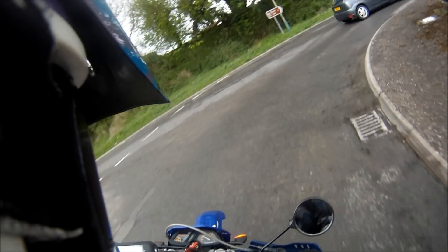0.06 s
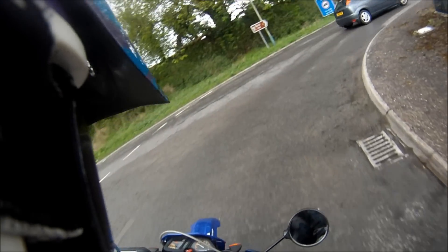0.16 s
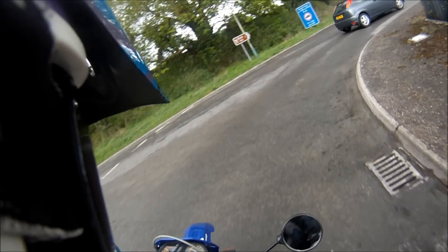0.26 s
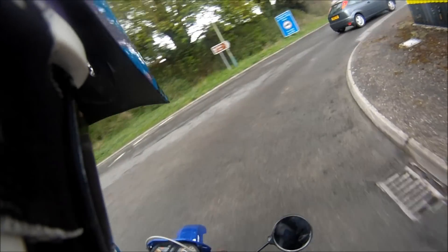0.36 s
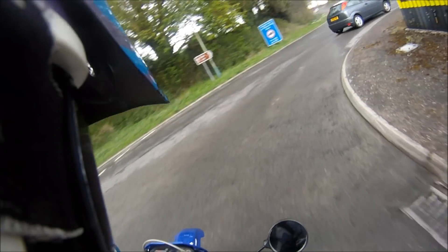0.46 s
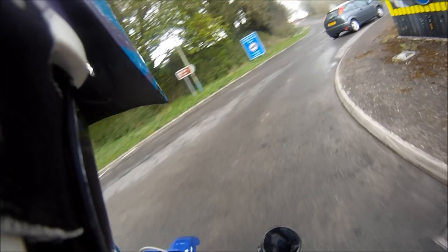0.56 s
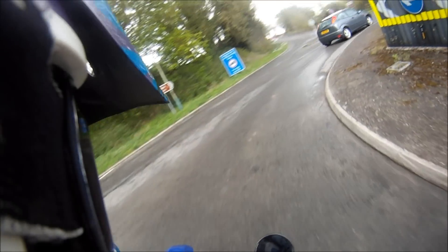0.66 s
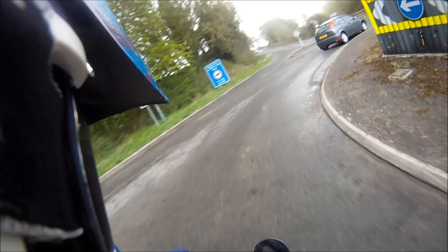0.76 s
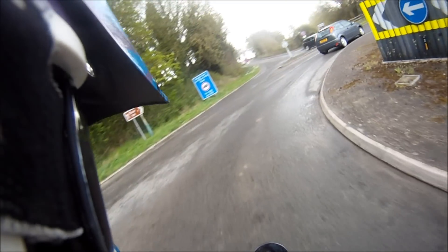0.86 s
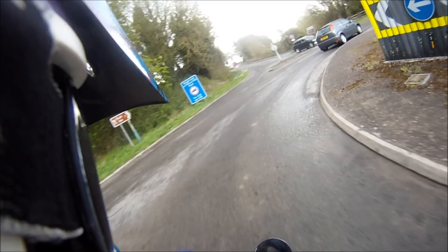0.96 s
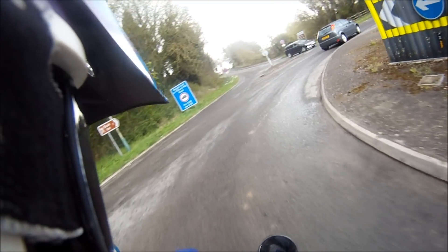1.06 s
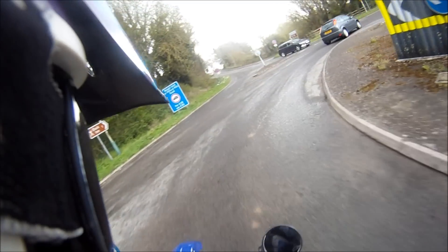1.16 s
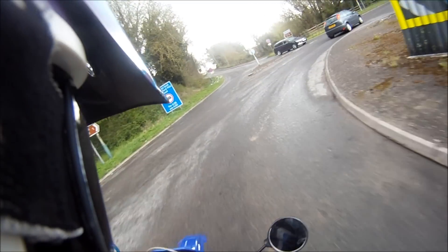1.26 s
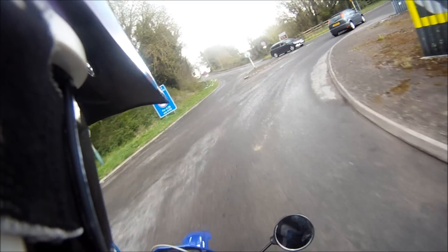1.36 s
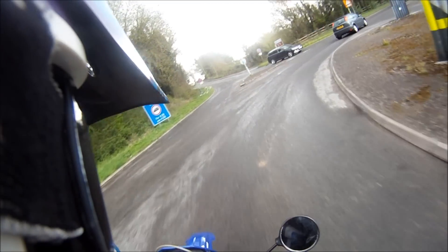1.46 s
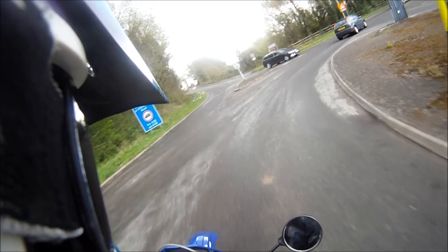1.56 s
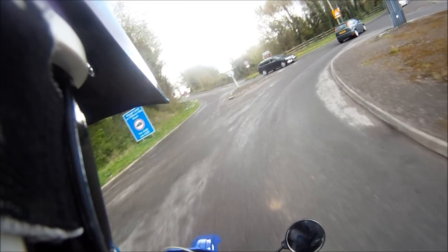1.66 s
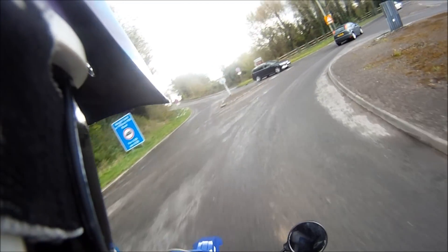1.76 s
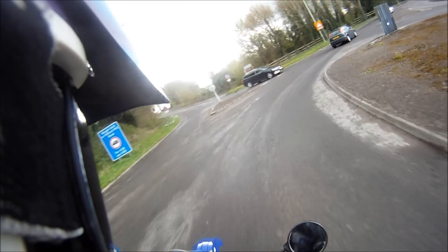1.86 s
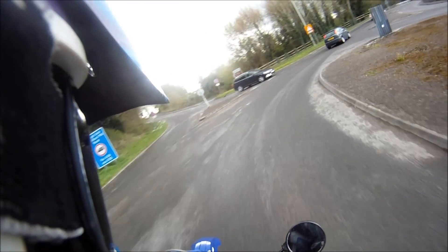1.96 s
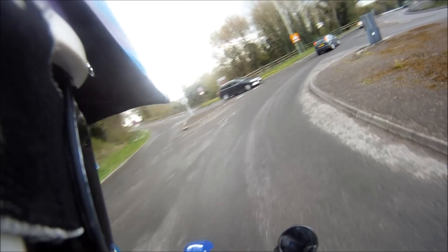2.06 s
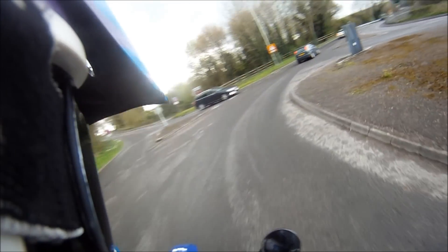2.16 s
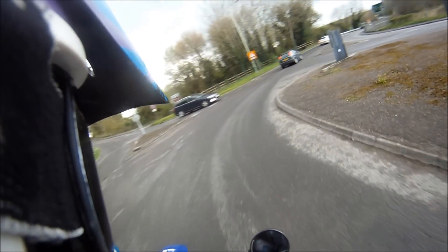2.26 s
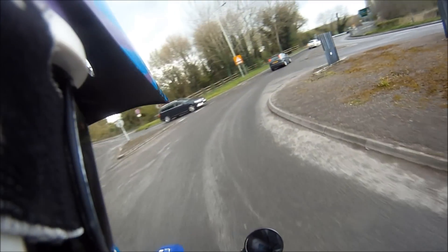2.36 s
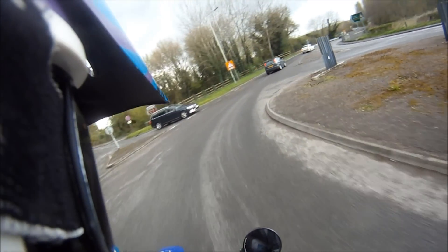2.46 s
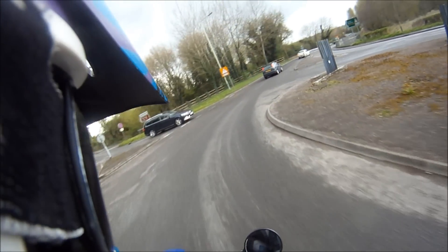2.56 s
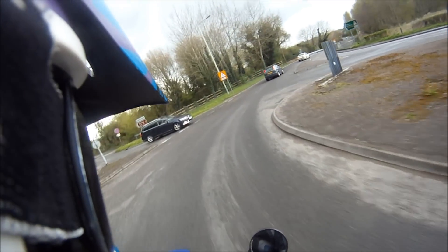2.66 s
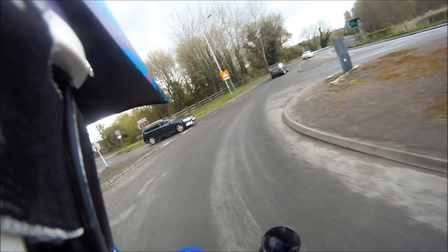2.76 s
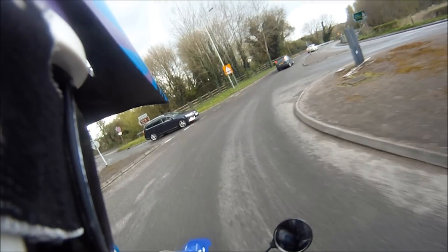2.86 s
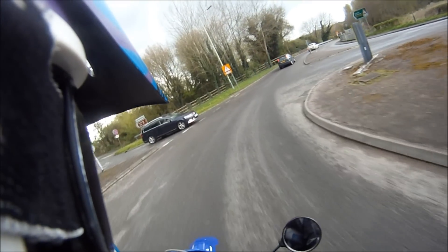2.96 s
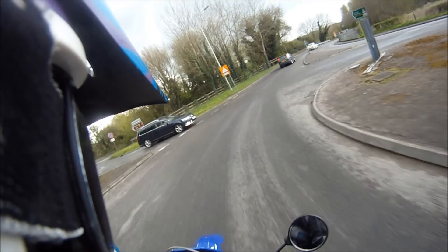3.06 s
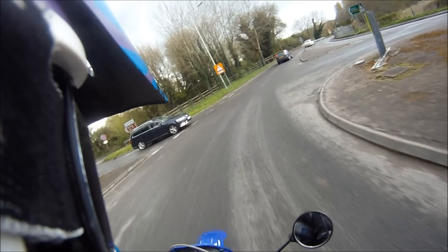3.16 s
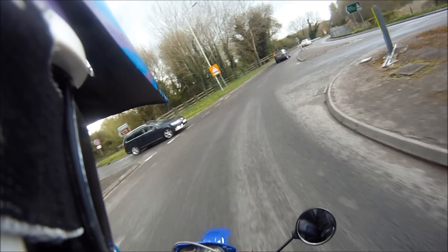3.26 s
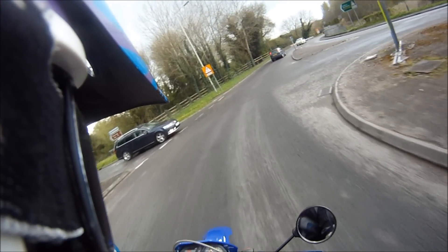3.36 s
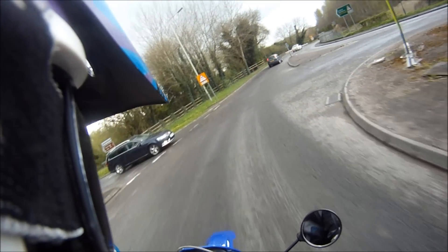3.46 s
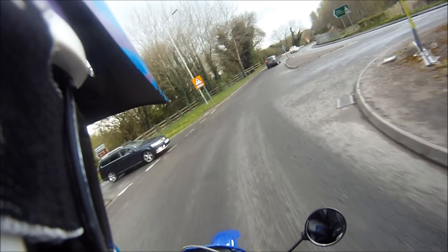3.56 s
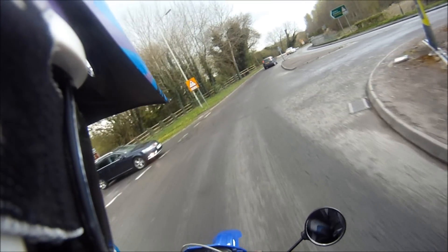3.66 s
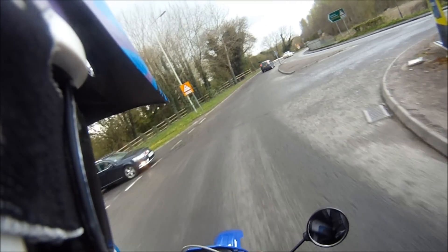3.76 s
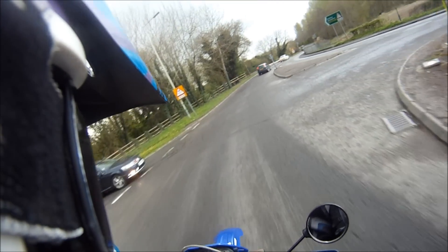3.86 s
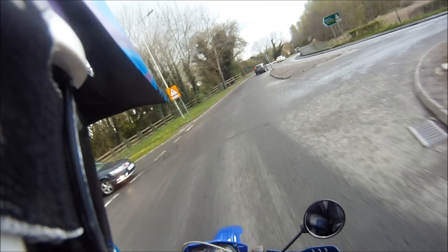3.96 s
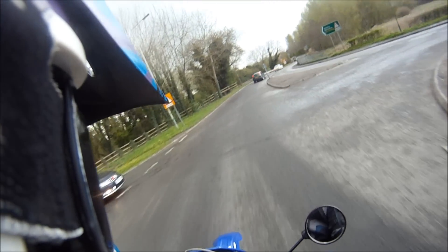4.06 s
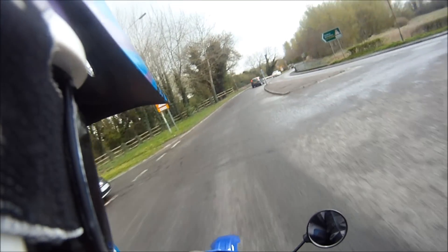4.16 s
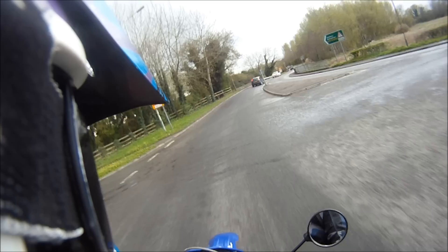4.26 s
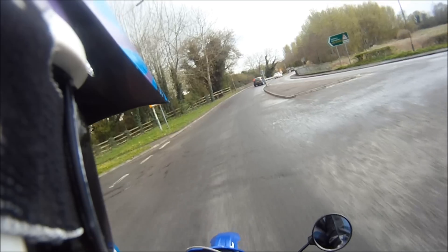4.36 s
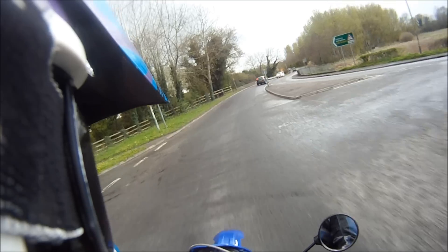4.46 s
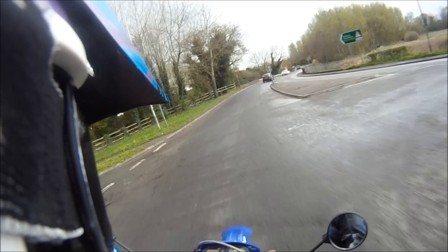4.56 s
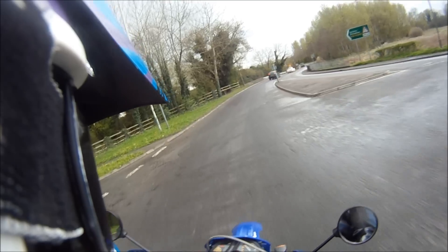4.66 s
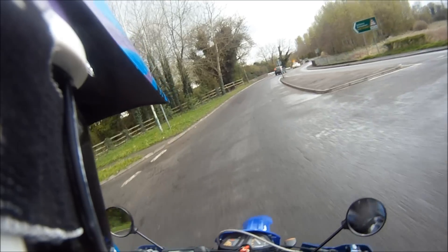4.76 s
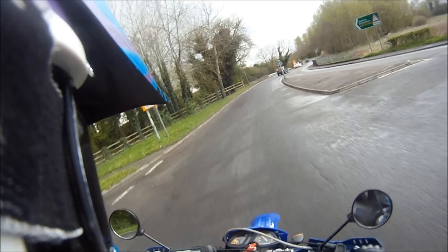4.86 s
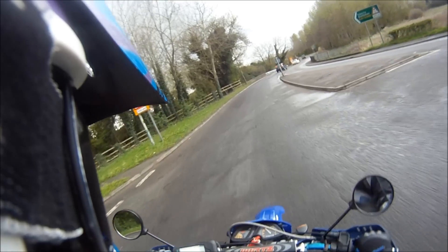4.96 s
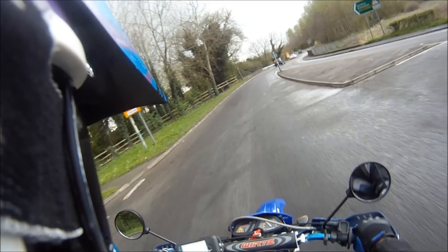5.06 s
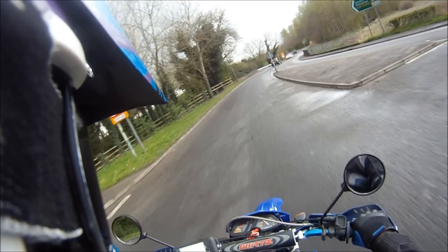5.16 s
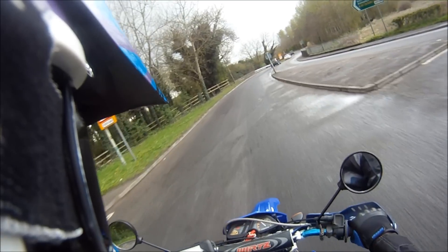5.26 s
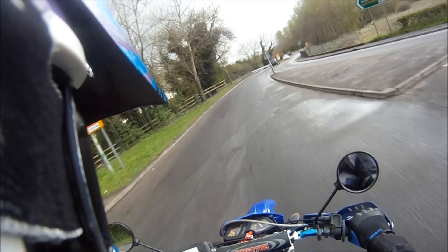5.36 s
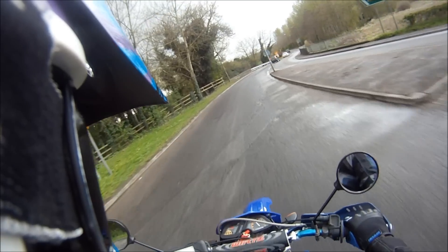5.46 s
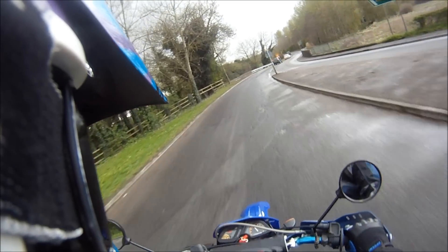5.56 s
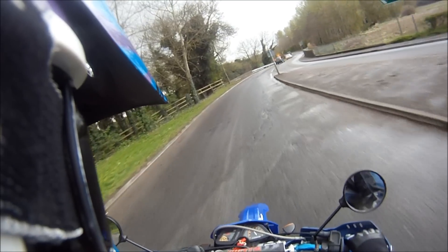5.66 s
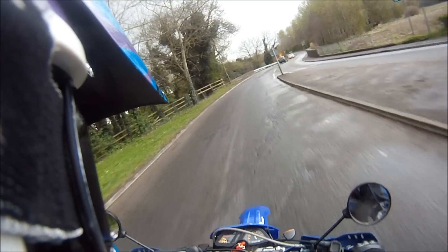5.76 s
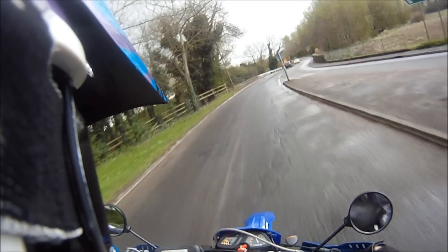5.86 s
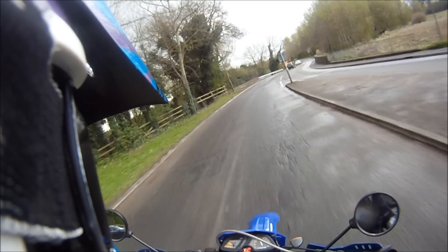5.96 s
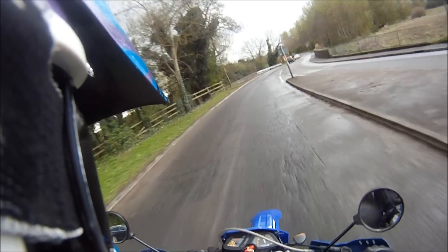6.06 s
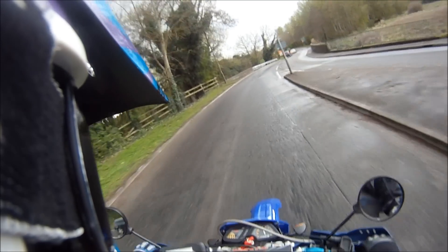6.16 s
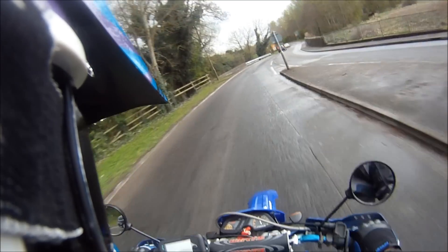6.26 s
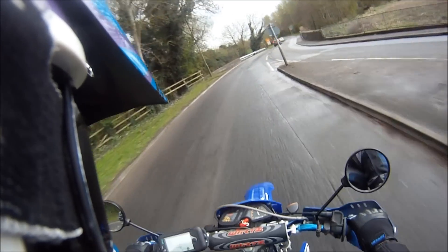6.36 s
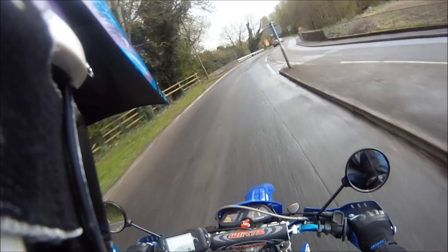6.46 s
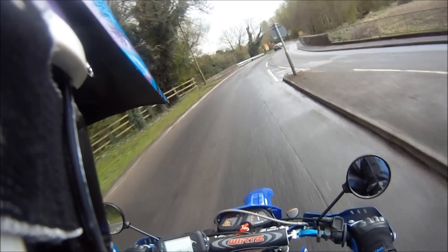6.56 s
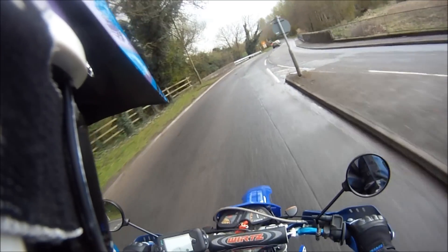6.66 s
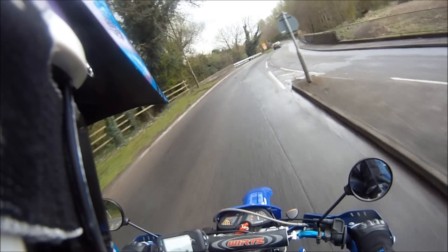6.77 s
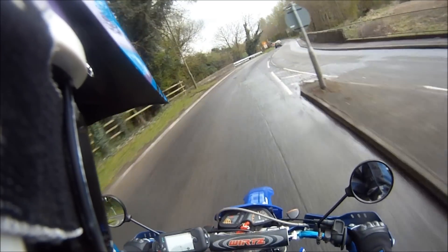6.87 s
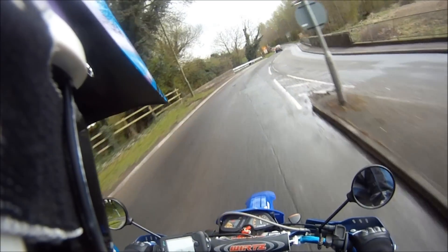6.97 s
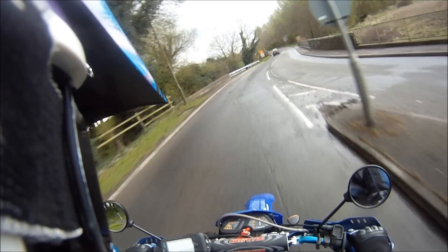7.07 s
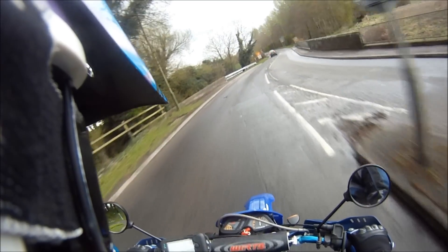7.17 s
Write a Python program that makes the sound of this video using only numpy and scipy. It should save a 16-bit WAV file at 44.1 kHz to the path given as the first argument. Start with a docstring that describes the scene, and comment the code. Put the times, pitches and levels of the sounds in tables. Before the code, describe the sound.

A small two-stroke moped drones and rattles at low, even revs, then accelerates along the road, its buzz growing higher, louder and tinnier. Near the end the throttle shuts for a moment, the pitch drops with a gear change, and the engine starts climbing again. Heard from the rider's helmet, wind thumps on the microphone over a rush of air and tyres that swells with speed.

```python
"""A two-stroke moped drones and rattles round a roundabout, revs away and changes up a gear at six seconds.
Exhaust pulses make the drone and ring the pipe; piston knocks and hissing gas rattle the cylinder.
Heard from the rider's helmet, wind buffets the microphone over a rush of air and tyres.
The small camera samples slowly and holds each sample, which mirrors the rattle into a fizzy treble."""
import sys
import numpy as np
from scipy import signal
from scipy.fft import rfft, irfft, next_fast_len
from scipy.io import wavfile
from scipy.ndimage import uniform_filter1d

SR = 44100
rng = np.random.default_rng(int(sys.argv[2]) if len(sys.argv) > 2 else 0)


def store_wav(level_fs):
    """Save 16-bit WAV to argv[1]."""
    pcm = np.round(np.clip(np.atleast_2d(level_fs), -1, 1) * 32767)
    wavfile.write(sys.argv[1], SR, pcm.T.astype(np.int16))


N = 318843
TIME = np.arange(N) / SR
FULL_POWER_HZ = 125  # firings per second at which the engine reaches full power

# The lowest three harmonics (multiples of the firing rate): level_db, loss_db_per_octave below full power
DRONE_HARMONICS = [(-44, 12.5), (-41, 34.5), (-43.5, 35.5)]
# The higher harmonics of an exhaust pulse: harmonic_number, level_db
PULSE_HARMONICS = [(4, 6), (5, 3.5), (6, 2.5), (7, 5.5), (8, 4), (9, 5), (10, 3.5), (11, -1.5), (12, -1),
                   (13, -2.5), (14, -3.5), (15, -5.5), (16, 0.5), (17, -5), (18, -2)]
# How the silencer shapes the low drone and the higher buzz: pitch_hz, gain_db
DRONE_TONE = [(80, -3.5), (100, 0.5), (110, -4), (138, 3), (168, -0.5), (200, 5.5), (250, 2), (275, -1.5),
              (302, -8), (325, -4), (350, -11), (381, 5.5), (450, -6.5), (480, 0.5)]
BUZZ_TONE = [(320, -7), (355, -13), (400, -3), (445, -1), (500, 0), (570, 0), (650, 2), (715, -10),
             (790, 4), (850, 1), (940, -11), (1010, -2), (1100, -22)]
# The ringing notes of the expansion chamber (the exhaust's bulge) and pipe: pitch_hz, width_hz, gain_db
CHAMBER_NOTES = [(1096, 34, 0)]
PIPE_NOTES = [(1185, 40, 9.5), (1250.6, 21, 5.5), (1347, 40, -1.5)]
# How loud each is as the engine speeds up: firings_per_s, level_db
BUZZ_LEVELS = [(79.5, -44.5), (82.5, -43), (92, -39), (104, -43.5), (111, -37.5), (120, -41), (140, -38.5),
               (152, -45), (165, -40.5)]
CHAMBER_LEVELS = [(80, -47), (91, -36), (101, -38), (112, -76), (130, -62), (160, -40)]
PIPE_LEVELS = [(79.5, -49.5), (82.5, -42), (93, -46), (103, -43), (108, -34.5), (120, -37), (131, -33),
               (147, -39), (155, -32), (165, -32.5)]
# Swell when a harmonic nears a pitch, drop with the throttle shut: pitch_hz, reach_hz, swell_db, drop_db
CHAMBER_RESPONSE = (1098, 25, 4.8, 1.3)
PIPE_RESPONSE = (1186, 24.5, 8.1, 8.5)

def exhaust(turns, firing_hz, shut, roughness, gas):
    """Pulses leave the silencer as a drone and a buzz; their higher harmonics ring the chamber and pipe."""
    uneven_turns = turns + .03 * roughness * drift(110)

    def harmonic(k):
        """A tone at k times the firing rate, shaken by rough burning."""
        tone = np.sqrt(2) * np.sin(2 * np.pi * (k * uneven_turns + .55 * rng.random()))
        return tone * (1 + .55 * roughness * drift(45))

    octaves_below = np.maximum(np.log2(FULL_POWER_HZ / firing_hz), 0)
    drone = sum(from_db(db - loss_db * octaves_below) * gain_at(DRONE_TONE, k * firing_hz) * harmonic(k)
                for k, (db, loss_db) in enumerate(DRONE_HARMONICS, 1))
    pulse = [(k, from_db(db + 2 * drift(3)) * harmonic(k)) for k, db in PULSE_HARMONICS]
    silenced = sum(gain_at(BUZZ_TONE, k * firing_hz) * wave for k, wave in pulse)
    buzz = from_db(at_speed(BUZZ_LEVELS, firing_hz)) * steady(silenced, .19)
    flow = sum(wave for _, wave in pulse) + from_db(46) * gas
    chamber = ringing(flow, CHAMBER_NOTES, CHAMBER_LEVELS, CHAMBER_RESPONSE, firing_hz, shut)
    pipe = ringing(flow, PIPE_NOTES, PIPE_LEVELS, PIPE_RESPONSE, firing_hz, shut)
    return drone + buzz + chamber + pipe


# How hard the piston slaps the cylinder wall: time_s, level_db
PISTON_SLAP = [(0, -1), (1.0, -2.5), (1.3, -5), (2.3, -2), (3.0, -1.5), (4.7, -7), (5.4, -6), (6.0, -1.5),
               (6.4, -19), (7.23, -4)]
# The knocks that follow each slap: share_of_turn, level_db
LATER_KNOCKS = [(0.219, -8), (0.508, -6), (0.768, -4), (0.902, -5.5)]
# The notes of the cooling fins, cylinder, thin rasping covers and tinny sizzle: pitch_hz, width_hz, gain_db
FIN_NOTES = [(1762, 91, -3.5), (1823, 25.5, 7.5), (1826, 30, -10)]
CYLINDER_NOTES = [(1875, 70, -3), (2005, 85, 1), (2050, 400, -9), (2130, 90, -8), (2305, 130, -9)]
COVER_NOTES = [(2550, 140, 0), (2710, 130, -1.5), (2860, 160, -4), (3150, 200, -9)]
SIZZLE_NOTES = [(3150, 526, 2.5), (3538, 340, 4.5), (3980, 170, -0.5), (4270, 220, -7), (4656, 230, -1),
                (5456, 190, -9.5)]
# How loud each is as the engine speeds up: firings_per_s, level_db
FIN_LEVELS = [(80, -39), (82.5, -31.5), (87, -39), (102, -42), (116, -53), (125, -33.5), (135, -33),
              (149, -31.5), (157, -33)]
CYLINDER_LEVELS = [(80, -45), (100, -37), (112, -34.5), (122, -32), (133, -30.5), (141, -25), (149, -32.5),
                   (157, -28.5), (165, -25.5)]
COVER_LEVELS = [(79.5, -42.5), (84, -42.5), (91, -36), (103, -40), (123, -31), (128, -32), (143, -27),
                (160, -30.5)]
SIZZLE_LEVELS = [(80, -43.5), (85, -44.5), (100, -41.5), (116, -41), (136, -32.5), (160, -32)]
# Swell when a harmonic nears a pitch, drop with the throttle shut: pitch_hz, reach_hz, swell_db, drop_db
FIN_RESPONSE = (1820, 20, 4.75, 6.6)
CYLINDER_RESPONSE = (2020, 64, 6.3, 8)
COVER_RESPONSE = (2715, 42, 1, 10.2)
SIZZLE_RESPONSE = (5300, 27, 1.1, 10.2)

def rattle(turns, firing_hz, shut, roughness, gas, gear_engages_s=6.205):
    """Piston slap, lesser knocks and escaping gas set the finned cylinder and its covers ringing."""
    slap_db, = over_time(PISTON_SLAP)
    shaking = gas + from_db(slap_db) * clicks(turns, 0, roughness)
    for share_of_turn, db in LATER_KNOCKS:
        shaking += from_db(db) * clicks(turns, share_of_turn, roughness)
    jolt_db = 7.5 * bump(gear_engages_s, .016)  # the next gear jolts the casing
    fins = ringing(shaking, FIN_NOTES, FIN_LEVELS, FIN_RESPONSE, firing_hz, shut)
    cylinder = ringing(shaking, CYLINDER_NOTES, CYLINDER_LEVELS, CYLINDER_RESPONSE, firing_hz, shut)
    covers = ringing(shaking, COVER_NOTES, COVER_LEVELS, COVER_RESPONSE, firing_hz, shut)
    sizzle = ringing(shaking, SIZZLE_NOTES, SIZZLE_LEVELS, SIZZLE_RESPONSE, firing_hz, shut)
    return fins + cylinder + from_db(jolt_db) * (covers + sizzle)


def clicks(turns, share_of_turn, roughness):
    """One click per engine turn; timing and force wander slowly, and rough burning scatters both."""
    wandering_turns = turns + (.002 + .014 * share_of_turn) * drift(6)
    when_s = np.interp(np.arange(int(turns[-1])) + share_of_turn, wandering_turns, TIME)
    time_scatter, force_scatter = rng.standard_normal((len(when_s), 2)).T * np.interp(when_s, TIME, roughness)
    position = np.clip((when_s + .00012 * time_scatter) * SR, 0, N - 2)
    force = from_db(7 * force_scatter + 1.5 * np.interp(when_s, TIME, drift(7)))
    sample = position.astype(int)
    spill = position - sample  # each click is shared between two samples
    return np.bincount(sample, force * (1 - spill), N) + np.bincount(sample + 1, force * spill, N)


def ringing(shaking, notes, levels, response, firing_hz, shut, waver_db=1.2):
    """A metal part rings, louder as a harmonic sweeps through its pitch, softer with the throttle shut."""
    pitch_hz, reach_hz, swell_db, drop_db = response
    miss_hz = pitch_hz - np.round(pitch_hz / firing_hz) * firing_hz  # gap to the nearest harmonic
    level_db = at_speed(levels, firing_hz) + swell_db / (1 + (miss_hz / reach_hz) ** 2) - drop_db * shut
    lowest_hz = notes[0][0]
    bass_cut = signal.butter(6, .92 * lowest_hz, "high", fs=SR, output="sos")  # small parts give no bass
    ring = signal.sosfilt(bass_cut, resonate(shaking, notes))
    return steady(ring, .035) * from_db(level_db + waver_db * drift(14))


# The bark fades as the revs rise: firings_per_s, level_db
BARK_LEVELS = [(80, -36.5), (83, -38.5), (88, -39), (93, -48), (101, -60)]

def bark(turns, firing_hz, roughness, pitch_hz=2080, width_hz=620):
    """At low revs the exhaust port gives one quickly dying burst each time it opens."""
    port = [(pitch_hz, width_hz, 0)]
    openings = clicks(turns, .3, roughness)
    bursts = resonate(resonate(openings, port), port)
    return from_db(at_speed(BARK_LEVELS, firing_hz)) * steady(bursts, .06)


# How loud the thumping air and the rush of air and tyres are: time_s, level_db
BUFFET_LEVELS = [(0, -38), (1.8, -39), (3.3, -43), (5, -39), (5.8, -42), (6.2, -37), (6.35, -31),
                 (7.23, -36)]
RUSH_LEVELS = [(0, -52), (2, -53), (3.5, -52), (4.7, -49), (5.3, -44), (5.9, -45), (6.2, -44), (6.4, -41),
               (7.23, -42)]
# Single gusts: peak_s, half_width_s, level_db
WIND_GUSTS = [(.75, .025, -45), (5.31, .022, -34), (6.35, .07, -36), (6.6, .15, -41)]
# How deep or bright each noise is: pitch_hz, gain_db
BUFFET_TONE = [(12, -16), (22, 2), (30, 1), (42, -3), (55, -19), (80, -18), (130, -31.5), (300, -31)]
RUSH_TONE = [(40, -43), (80, 14), (150, 11.5), (230, 9.5), (350, 11), (650, 4.5), (950, 4), (1500, 14.5),
             (2500, -21), (5500, -58)]
GUST_TONE = [(25, -13), (55, 10), (110, -6), (200, -23.5), (400, -38), (1000, -53)]

def wind(lumps_db=2, flutter_db=3.2):
    """Swirls of air thump on the helmet under a broad rush; both are loudest once the moped is going fast."""
    buffet_db = over_time(BUFFET_LEVELS)[0] + lumps_db * drift(10)
    buffet = from_db(buffet_db) * steady(noise(BUFFET_TONE), .056)
    rush_db = over_time(RUSH_LEVELS)[0] + flutter_db * drift(37)
    rush = from_db(rush_db) * noise(RUSH_TONE)
    gust_gain = sum(from_db(db) * bump(peak_s, half_width_s) for peak_s, half_width_s, db in WIND_GUSTS)
    return buffet + rush + gust_gain * steady(noise(GUST_TONE), .024)


def from_db(db):
    """Turn decibels into a gain."""
    return 10 ** (np.asarray(db) / 20)


def unit_power(x):
    """Scale a signal to an average power of one."""
    return x / np.sqrt(np.mean(x ** 2) + 1e-20)


def over_time(rows):
    """Each column of a timed table at every sample."""
    times_s, *columns = np.transpose(rows)
    return [np.interp(TIME, times_s, column) for column in columns]


def at_speed(levels, firing_hz):
    """Look up the level in dB for an engine speed."""
    return np.interp(firing_hz, *np.transpose(levels))


def gain_at(tone, hz):
    """Look up the gain for a pitch."""
    pitch_hz, gain_db = np.transpose(tone)
    return from_db(np.interp(np.log(hz + 1e-9), np.log(pitch_hz), gain_db))


def bump(peak_s, half_width_s):
    """A smooth rise to one and back."""
    return np.exp(-((TIME - peak_s) / half_width_s) ** 2)


def noise(tone):
    """Noise with the given tone and a power of one."""
    size = next_fast_len(N)
    spectrum = rfft(rng.standard_normal(size)) * gain_at(tone, np.fft.rfftfreq(size, 1 / SR))
    return unit_power(irfft(spectrum, size)[:N])


def drift(changes_per_s):
    """A random wander with a typical size of one."""
    points = rng.standard_normal(4000)
    return unit_power(np.interp(TIME * changes_per_s, np.arange(len(points)), points))


def steady(x, seconds):
    """Hold the power at one over spans longer than the given time."""
    size = max(int(seconds * SR), 2)
    power = uniform_filter1d(uniform_filter1d(x * x, size), size)
    return x / np.sqrt(np.abs(power) + 1e-12)


def resonate(x, notes):
    """Ring one filter per note and add them with alternating signs; narrow notes ring longer."""
    out = 0
    for k, (pitch_hz, width_hz, db) in enumerate(notes):
        decay = np.exp(-np.pi * width_hz / SR)
        gain = (1 - decay ** 2) / 2
        feedback = [1, -2 * decay * np.cos(2 * np.pi * pitch_hz / SR), decay ** 2]
        out = out + (-1) ** k * from_db(db) * signal.lfilter([gain, 0, -gain], feedback, x)
    return out


# Engine speed, one firing per turn, falling at the gear change: time_s, firings_per_s
ENGINE_SPEED = [(0.0, 79.6), (0.22, 79.2), (0.42, 80.3), (0.5, 78.6), (0.95, 80.3), (1.01, 79.3),
                (1.19, 82.9), (1.33, 81.5), (1.53, 82.8), (1.61, 82.3), (2.01, 84.0), (2.56, 89.2),
                (2.98, 95.9), (3.04, 95.7), (3.26, 100.7), (3.42, 100.8), (3.6, 104.1), (3.79, 102.8),
                (3.83, 105.7), (3.99, 107.5), (4.07, 105.0), (4.15, 107.9), (4.35, 108.6), (4.65, 112.9),
                (4.71, 115.7), (4.79, 116.8), (5.19, 130.3), (5.38, 139.2), (5.66, 150.6), (5.76, 152.9),
                (6.02, 164.1), (6.18, 154.9), (6.24, 125.0), (6.26, 119.4), (6.32, 124.7), (6.38, 122.4),
                (6.99, 134.1), (7.23, 141.5)]
SHUT_S, OPEN_S, RAMP_S = 6.0, 6.26, .017  # the throttle shuts and reopens for the gear change

def scene():
    """Engine speed and throttle drive the exhaust, rattle and bark, with wind behind them."""
    firing_hz = over_time(ENGINE_SPEED)[0] * (1 + .002 * drift(16))  # the speed hunts a little
    shut = np.clip(np.minimum(TIME - SHUT_S, OPEN_S - TIME) / RAMP_S + .5, 0, 1)  # 0 open, 1 shut
    octaves = np.log2(firing_hz / FULL_POWER_HZ)
    # Burning gets rougher and the gas hisses more at high revs and with the throttle shut.
    roughness = .19 + .14 * octaves + .27 * shut
    hiss_db = -10 + 2.5 * octaves + 9 * shut
    turns = np.cumsum(firing_hz) / SR
    port_open = unit_power(np.exp(np.cos(2 * np.pi * (turns - .1))))  # gas hisses out once a turn
    gas = from_db(hiss_db) * port_open * rng.standard_normal(N) * np.sqrt(firing_hz / SR)
    engine = exhaust(turns, firing_hz, shut, roughness, gas)
    engine += rattle(turns, firing_hz, shut, roughness, gas)
    engine += bark(turns, firing_hz, roughness)
    return (engine + wind())[None]


def record(dry, hold_hz=12000, cutoff_hz=15350):
    """The camera samples slowly and holds each value, mirroring the sound around its sampling rate."""
    slow = signal.resample_poly(dry, hold_hz, SR, axis=1, window=("kaiser", 5))
    steps = np.repeat(slow, 4, axis=1)
    held = signal.resample_poly(steps, SR, 4 * hold_hz, axis=1)[:, :N]
    return signal.sosfilt(signal.ellip(12, .2, 80, cutoff_hz, fs=SR, output="sos"), held)


dry = scene()
out = record(dry)
store_wav(out)
```